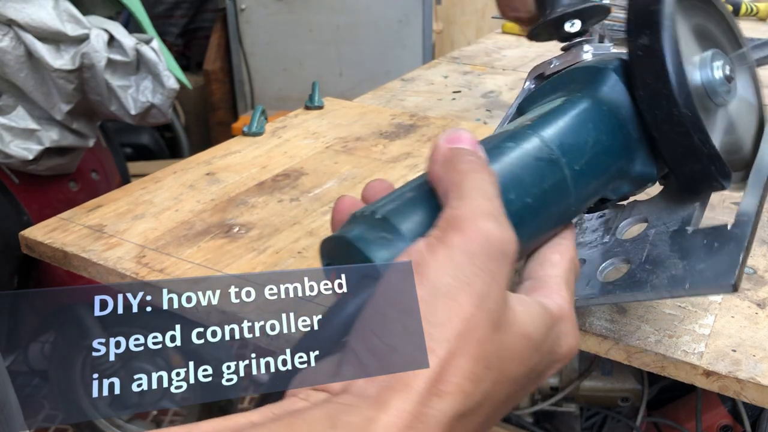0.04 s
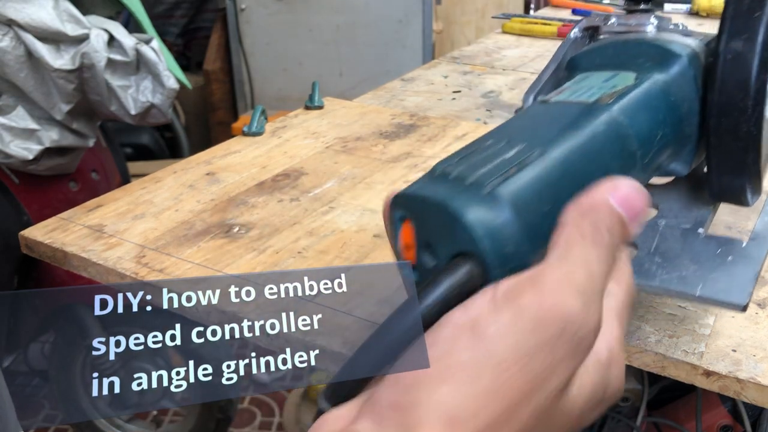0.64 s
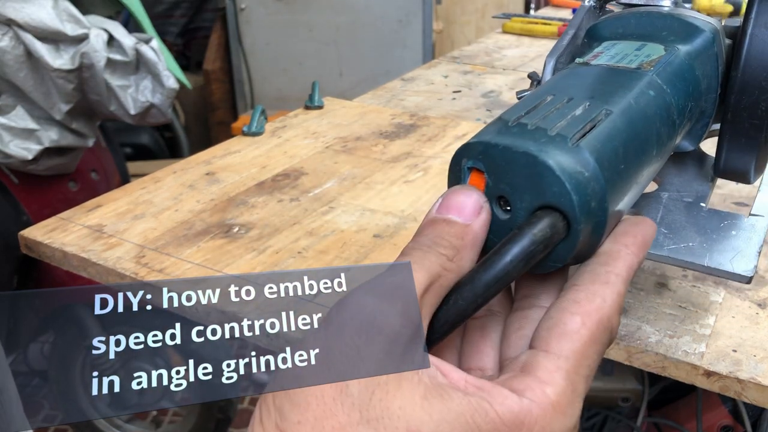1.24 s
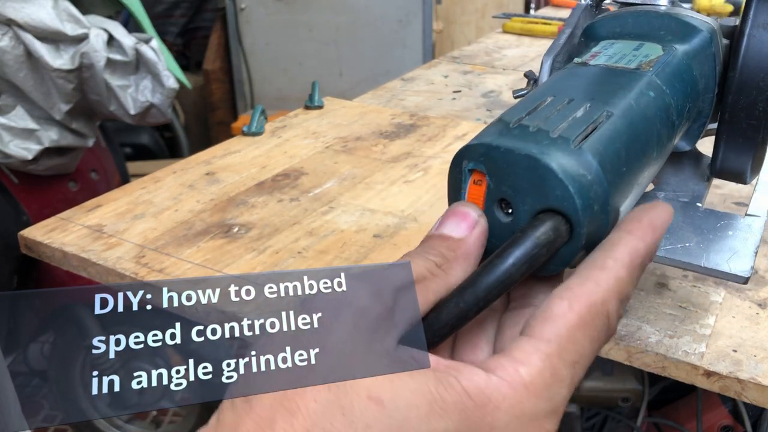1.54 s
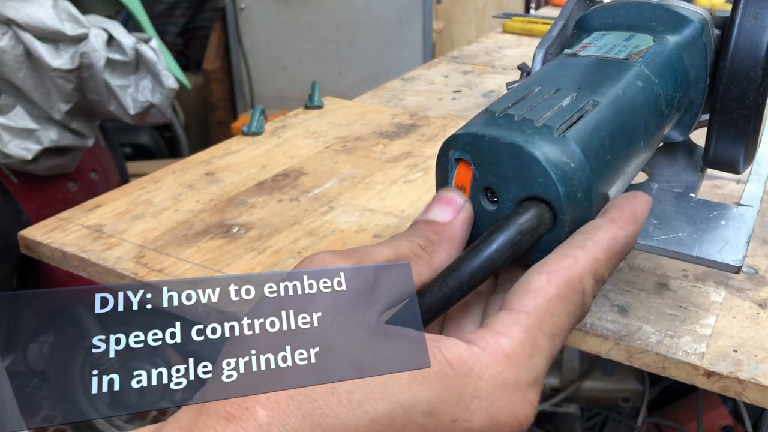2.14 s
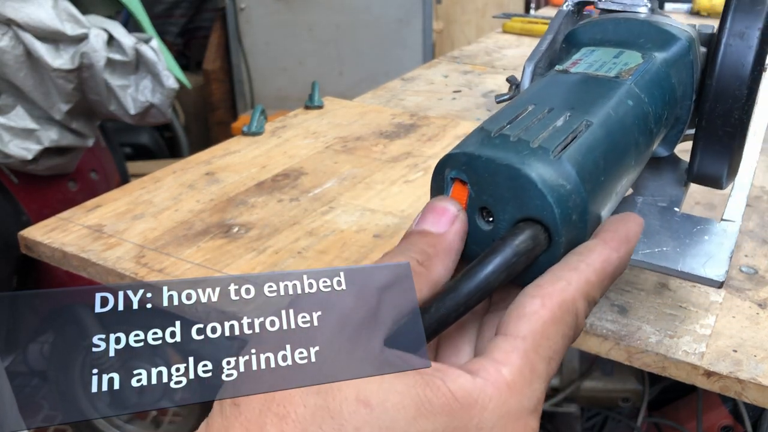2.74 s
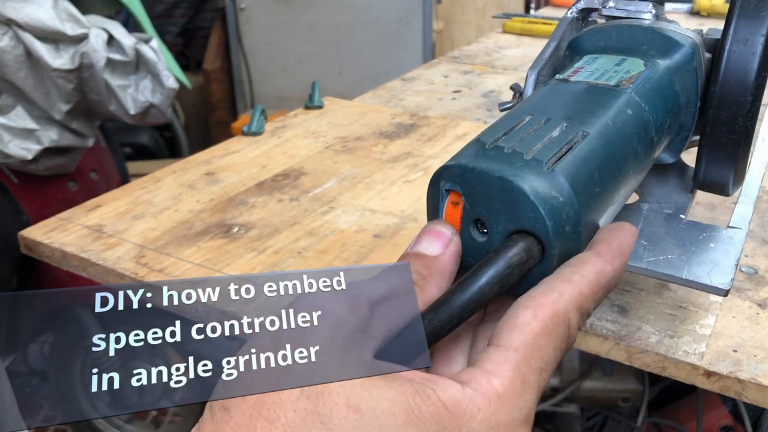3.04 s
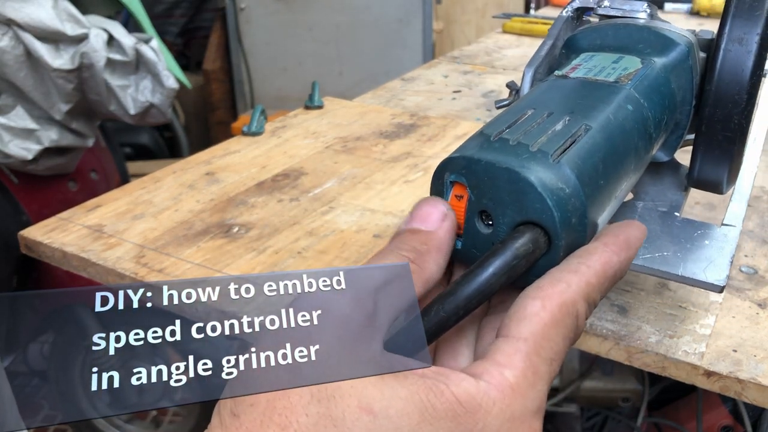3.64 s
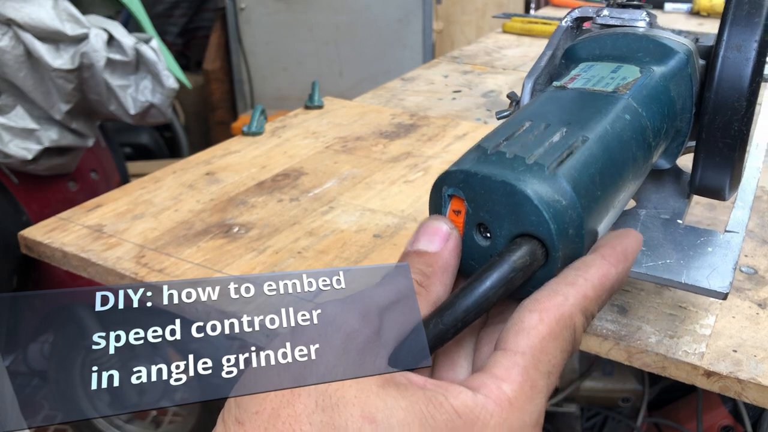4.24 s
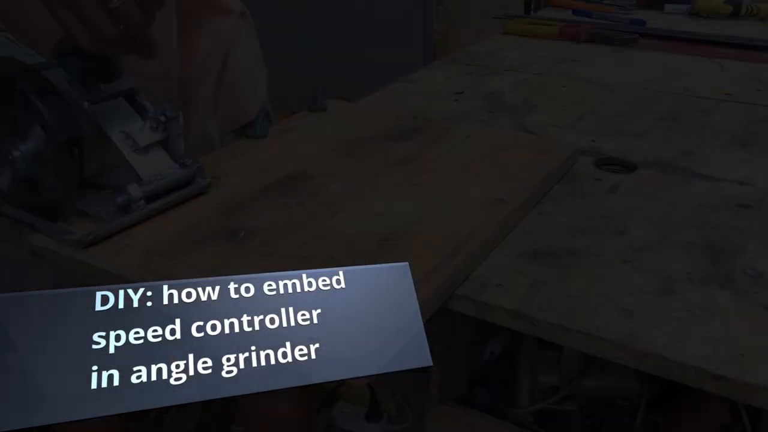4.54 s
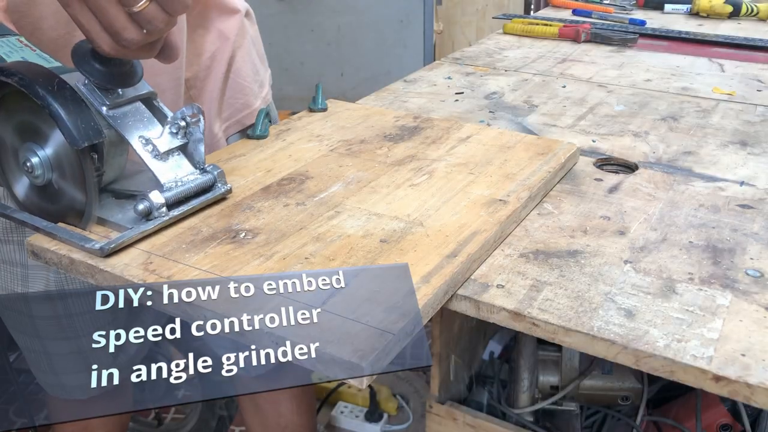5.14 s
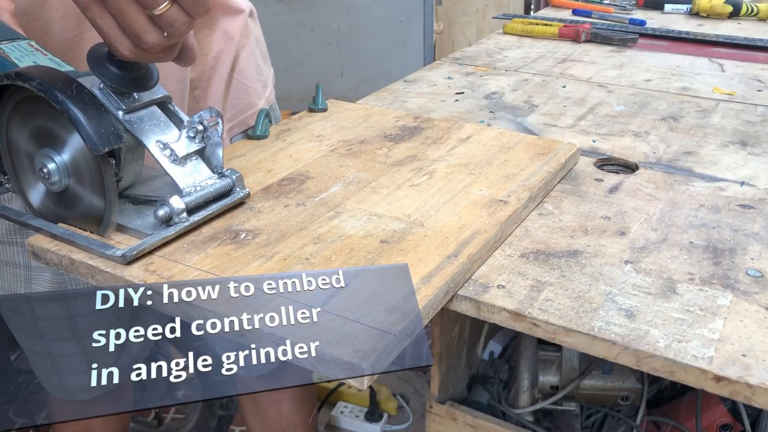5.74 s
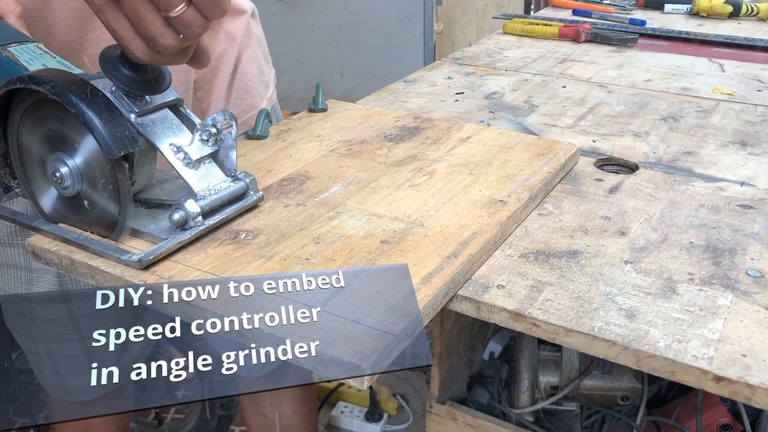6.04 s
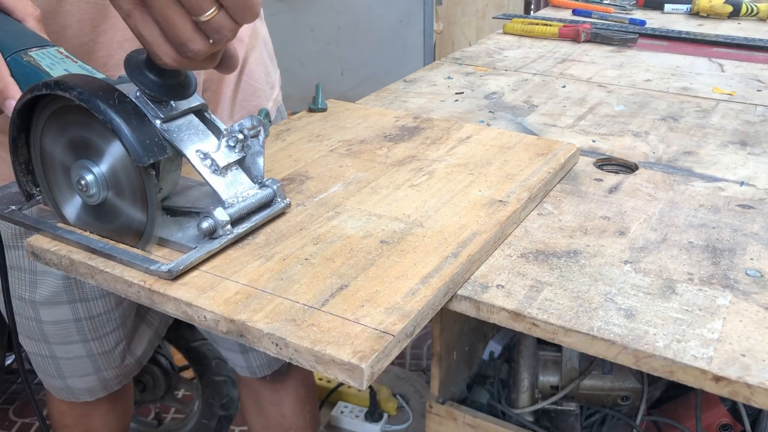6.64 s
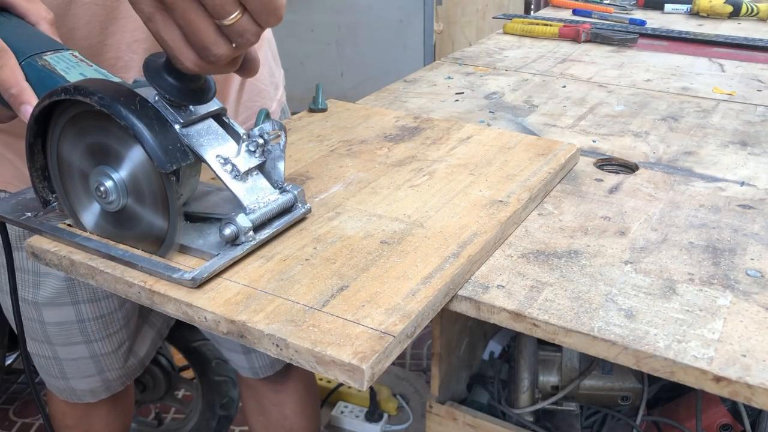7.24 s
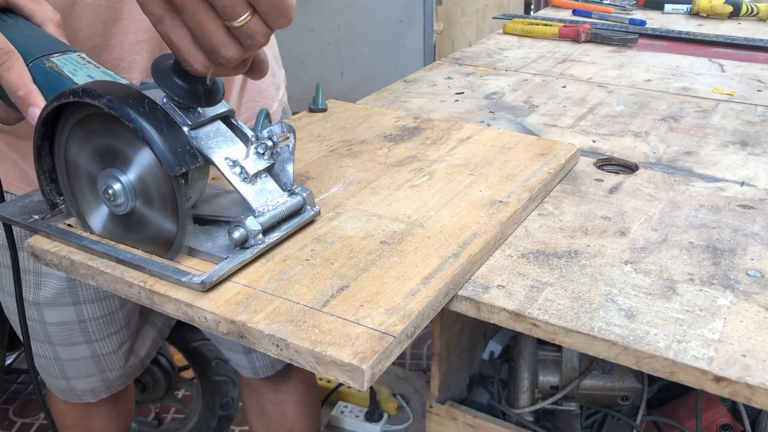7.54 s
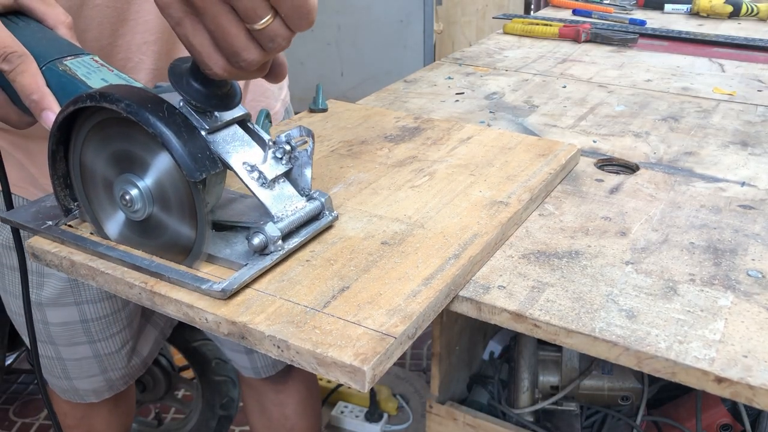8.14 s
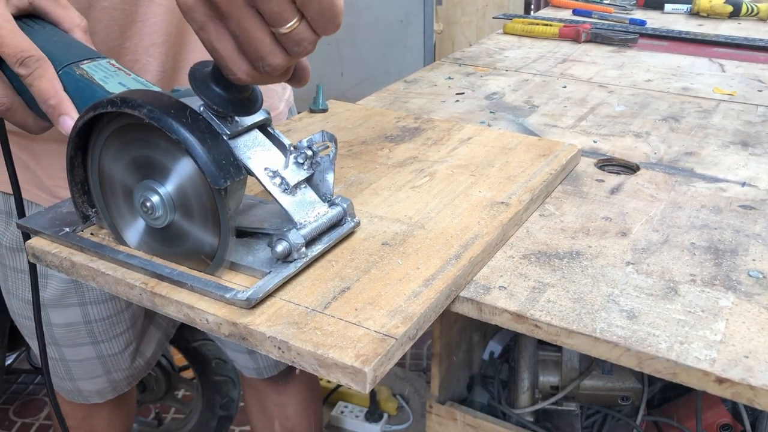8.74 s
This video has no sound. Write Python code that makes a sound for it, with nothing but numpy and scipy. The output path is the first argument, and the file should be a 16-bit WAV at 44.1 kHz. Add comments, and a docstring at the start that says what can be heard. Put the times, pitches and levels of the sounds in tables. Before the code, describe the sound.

An angle grinder runs free, whining with rushing air and clacking gears, then abruptly its spinning saw blade is heard ringing and hissing.

```python
"""An angle grinder with a saw blade runs free on a workbench while its speed dial is turned. The microphone
starts close to the motor end: the whine climbs and eases over the rush of the fan, and the bevel gears clack in
their backlash. Now and then the sound's noise cuts out for an instant. At 4.5 s the position changes abruptly
to the blade side: the spinning disc sings, with brief squeals, and its teeth hiss. From 6 s the fan's draught
puffs on the microphone."""
import sys
import numpy as np
from scipy import signal
from scipy.fft import rfft, irfft
from scipy.io import wavfile

SR = 44100
rng = np.random.default_rng(int(sys.argv[2]) if len(sys.argv) > 2 else 0)


def unload_audio(sound):
    """Save the sound as a 16-bit wav file, at the path given as the first command line argument."""
    columns = np.transpose(np.atleast_2d(sound))
    # keep every value between -1 and 1, then stretch to whole-number steps
    steps = np.round(np.clip(columns, -1, 1) * 32767)
    wavfile.write(sys.argv[1], SR, steps.astype(np.int16))


N = 396459
T = np.arange(N) / SR
MOTOR_END_UNTIL_S, BLADE_SIDE_FROM_S = 4.546, 4.563
SWING_S = 0.4   # the tool is swung from side-on to rear-on to the microphone
CUTOFF_HZ = 15850

# Microphone close to the motor end. Levels in all tables are relative: each source adds its own gain.
# rotor speed: (time [s], speed [turns/s])
MOTOR_END_SPEED = [(0, 440), (.25, 450), (.55, 465), (1, 487), (1.6, 487), (2.15, 503), (2.8, 495),
                   (3.4, 486), (4, 474), (4.55, 461)]
# main whine, at twice the rotor speed: (time [s], level [dB])
MAIN_WHINE = [(0.1, -46.5), (.45, -41), (1.7, -38.5), (2.0, -50), (2.5, -46), (2.72, -35.5), (3.6, -36.5),
              (3.85, -43.5), (4.54, -42)]
# other whine lines: (multiple of rotor speed, level at part speed [dB], level at full speed [dB])
WHINE_LINES = [(1, -57, -58.5), (3, -51, -38), (4, -35.5, -51.5), (5, -42, -41)]
# fan rush spectrum: (frequency [Hz], level [dB])
FAN_SPECTRUM = [(150, -26.5), (400, -14.5), (800, -8.5), (1500, -6), (2100, -1.5), (2750, -6.5),
                (3500, -1.5), (5000, -4), (5800, 0), (7500, -3.5), (9700, -9.5), (11700, -6), (13500, -11),
                (15800, -7)]
# air leaving the vents: (time [s], drone level [dB], rumble level [dB])
VENT_AIR = [(0, -60.5, -67), (1.4, -58.5, -70), (2.0, -55, -63), (2.85, -48.5, -53.5), (3.3, -47.5, -55),
            (3.8, -46.5, -59), (4.45, -47, -49)]
# vent drone spectrum: (frequency [Hz], level [dB])
DRONE_SPECTRUM = [(60, -11), (100, -8.5), (130, 3.5), (170, -3), (230, -5), (400, -12), (600, -23)]
# draught rumble spectrum: (frequency [Hz], level [dB])
RUMBLE_SPECTRUM = [(28, -20), (45, -8), (65, 3), (90, -5), (130, -6), (250, -27)]
# disc resonances heard from the motor end: (frequency [Hz], width [Hz], level [dB])
NEAR_DISC_MODES = [(2105, 70, -39), (2322, 35, -42), (3735, 70, -42), (4258, 110, -38), (5700, 280, -39),
                   (7120, 120, -46), (11800, 70, -42), (14900, 70, -48)]
# gear case resonances: (frequency [Hz], width [Hz], level side-on [dB], level rear-on [dB])
CASE_MODES = [(3520, 490, 3.5, 1), (4360, 215, -5, 8.5), (4790, 190, 6, 5), (5620, 290, 6, 1.5),
              (7030, 790, 4, -6), (8380, 400, -3, 0.5), (8980, 250, -1, -2.5), (12530, 640, -5, -14),
              (11720, 110, -10, -10), (12800, 890, -16, -6.5), (15100, 400, -1, -19)]
# single hard clacks: (time [s], level [dB])
HARD_CLACKS = [(0.0209, -6), (0.0458, -6), (0.0657, -8), (0.159, -5), (0.1815, -6), (0.4673, -4),
               (0.5596, -5), (0.6734, -4), (1.044, -4), (1.4601, -5), (1.495, -6), (1.6935, -4),
               (1.7823, -6), (1.941, -5), (2.1745, -4), (2.2543, -5), (2.374, -5), (2.4339, -4),
               (2.4738, -5), (2.9238, -4), (3.4032, -5), (3.5349, -5), (3.6042, -6), (3.6516, -4),
               (4.0123, -4), (4.119, -4), (4.364, -5), (4.4243, -3)]
# stray clacks, a few firm and many light: (rate [1/s], level [dB], spread [dB])
STRAY_CLACKS = [(9, -15, 3), (34.9, -20.5, 2.5)]
# bouts of gear chatter: (start [s], end [s], rate [1/s], level [dB])
CHATTER_BOUTS = [(0.084, .45, 52, -22), (.51, 1.359, 96, -15.5), (1.382, 1.43, 65, -15),
                 (1.734, 1.81, 55, -22), (2.126, 2.204, 80, -17.5), (2.595, 2.653, 135, -13.5),
                 (3.091, 3.35, 65, -17.5), (3.471, 3.502, 105, -14.5), (3.65, 3.788, 125, -15.5),
                 (3.833, 3.9, 65, -13.5), (4.025, 4.089, 105, -15), (4.128, 4.21, 125, -14.5),
                 (4.429, 4.54, 108, -14.5)]
# the sound's noise cuts out for an instant, at both positions: (time [s], half length [s], depth [dB])
DROPOUTS = [(1.627, .016, 20), (1.89, .023, 34), (2.086, .007, 9), (4.326, .008, 11), (5.059, .016, 36),
            (5.26, .011, 17), (5.623, .01, 12), (6.939, .033, 42), (8.006, .014, 31)]

# Microphone on the blade side.
# rotor speed: (time [s], speed [turns/s])
BLADE_SIDE_SPEED = [(4.56, 420), (4.8, 380), (5.15, 303), (5.5, 274), (5.9, 303), (6.35, 330), (6.52, 320),
                    (6.7, 360), (7, 363), (7.5, 382), (8, 371), (8.3, 380), (8.52, 324), (8.72, 332),
                    (8.99, 314)]
# fan rush: (time [s], level [dB])
BLADE_SIDE_FAN = [(4.57, -47.5), (5.9, -48), (6.5, -51.5), (8.3, -49.5), (8.48, -52), (8.66, -43.5),
                  (8.99, -41)]
# fan rush spectrum: (frequency [Hz], level [dB])
BLADE_SIDE_FAN_SPECTRUM = [(25, -25), (60, -8), (150, -8.5), (240, -7), (330, 0), (700, -2), (1100, 0),
                           (1700, 3), (2300, 5.5), (3300, 7.5), (4700, -6), (7800, -6.5), (15800, 4.5)]
# spectrum of the fine hiss off the rim: (frequency [Hz], level [dB])
RIM_SPECTRUM = [(7000, -3), (8500, -7), (10500, -4), (12000, 1), (13500, -3), (15800, -17)]
# motor whine: (time [s], level [dB])
BLADE_SIDE_WHINE = [(4.8, -55), (5.1, -75), (6.2, -63), (6.5, -60), (7.3, -54.5), (8.3, -61.5),
                    (8.7, -48.5), (8.99, -43)]
# low, middle and top disc modes, then bands of tooth hiss:
# (frequency when slow [Hz], shift when fast [Hz], width [Hz], level slow [dB], level fast [dB])
LOW_MODES = [(2135, -25, 100, -3, -5), (2300, 10, 90, -17, -11), (2850, 65, 110, -11, -10),
             (3850, 40, 60, -10, -11), (4380, -100, 45, -16, -14), (5085, 70, 40, -12, -14)]
MID_MODES = [(7570, -40, 95, -9, -14), (8100, 90, 70, -6, -5), (8530, -130, 105, -13, -14),
             (8980, -90, 95, -8, -12), (9720, 150, 130, -2, -1), (10110, -370, 90, -5, -10),
             (10670, -115, 80, -6, -9), (11530, 100, 95, -1, 2), (11780, -260, 125, -5, -6),
             (12580, -110, 65, -8, -8)]
TOP_MODES = [(13370, 80, 220, 1, 2), (13650, 100, 130, -1, -4), (14030, 50, 130, -6, -3),
             (14580, -130, 85, -8, -5), (14940, -40, 185, -2, -4), (15170, 215, 125, -2, 1),
             (15690, 20, 100, -2, -5)]
TOOTH_BANDS = [(5790, 110, 210, 6, -8), (6100, 300, 605, 4, -1), (6540, 80, 150, 0, -1),
               (7040, 40, 185, 0, -5)]
# ringing of the low disc modes: (time [s], level [dB])
LOW_RING = [(4.57, -36.5), (5.55, -38), (6.2, -32), (7.2, -34.5), (8.35, -38.5), (8.38, -44.5),
            (8.6, -38.5), (8.67, -25.5), (8.82, -36.5), (8.99, -29)]
# ringing of the upper disc modes: (time [s], middle level [dB], top level [dB])
UPPER_RING = [(4.6, -25, -26.5), (5.2, -27, -28.6), (5.35, -31, -29), (5.5, -29, -27), (5.9, -30, -27),
              (6.05, -25.5, -25), (6.55, -28.5, -27.2), (6.65, -32.5, -34.1), (6.82, -27.5, -27.5),
              (7.9, -28.0, -26), (8.35, -29, -29), (8.365, -42, -45.6), (8.58, -38.6, -50),
              (8.72, -25, -28), (8.8, -37.5, -48), (8.99, -32, -40)]
# hiss of the saw teeth: (time [s], level [dB])
TOOTH_HISS = [(4.57, -32), (4.95, -24), (5.75, -24), (6.4, -29.5), (6.8, -28), (7.45, -33), (8.35, -29.5),
              (8.365, -38), (8.99, -26.5)]
# brief squeals, and two narrow bands of hiss near 5.7 kHz at the end:
# (start [s], end [s], frequency [Hz], width [Hz], level [dB])
SQUEALS_AND_HISS = [(4.57, 4.86, 13600, 300, -31), (4.625, 4.745, 3700, 25.3, -40),
                    (4.966, 5.054, 3830, 5.6, -38), (5.166, 5.24, 3820, 4.3, -42),
                    (6.201, 6.466, 3427, 7, -42), (6.906, 6.968, 2152, 10, -33.5),
                    (7.992, 8.016, 2130, 9.65, -42), (8.645, 8.772, 3490, 3.8, -36),
                    (8.621, 9.098, 5670, 66, -39.5), (8.88, 9.096, 5740, 170, -42)]
# puffs on the microphone: (time [s], level [dB])
PUFFS = [(6.021, -40.5), (6.375, -31.5), (6.418, -33), (7.98, -32.5), (8.045, -30.5), (8.145, -28),
         (8.167, -33), (8.205, -28), (8.234, -33), (8.277, -26.5), (8.3, -29)]


def from_db(db):
    """Decibels to gain."""
    return 10 ** (np.asarray(db) / 20)


def unit_power(x):
    """Scale to unit power along time."""
    return x / np.sqrt(np.mean(x ** 2, axis=-1, keepdims=True) + 1e-20)


def in_time(rows):
    """Each column of a curve, sample by sample."""
    s, *columns = np.transpose(rows)
    return [np.interp(T, s, c) for c in columns]


def drift(rate_hz):
    """Smooth random wander with a spread of 1."""
    r = np.exp(-16 * np.pi * rate_hz / SR)
    slow = signal.lfilter([1], [1, -2 * r, r * r], rng.standard_normal(N // 8 + 4002))[4000:]
    return np.interp(np.arange(N) / 8, np.arange(len(slow)), unit_power(slow))


def noise(spectrum):
    """Steady noise of a given colour, unit power."""
    hz, level_db = np.transpose(spectrum)
    f = np.maximum(np.arange(N // 2 + 1) * SR / N, 1)
    gain = from_db(np.interp(np.log(f), np.log(hz), level_db))
    gain *= (f < CUTOFF_HZ) * np.minimum(f / hz[0], 1)
    return unit_power(irfft(rfft(rng.standard_normal(N)) * gain, N))


def phase_of(hz):
    """Running angle of a frequency that may move."""
    return 2 * np.pi * np.cumsum(hz + np.zeros(N)) / SR


def singing(hz, width_hz):
    """A resonance kept ringing at random: a tone of wandering strength and phase, unit power."""
    angle = phase_of(hz)
    return drift(0.56 * width_hz) * np.cos(angle) + drift(0.52 * width_hz) * np.sin(angle)


def resonate(x, hz, width_hz):
    """Two-pole resonance with a peak gain of 1."""
    r = np.exp(-np.pi * width_hz / SR)
    poles = [1, -2 * r * np.cos(2 * np.pi * hz / SR), r * r]
    return signal.lfilter(np.array([1, 0, -1]) * (1 - r * r) / 2, poles, x)


def band(x, low_hz, high_hz, order=5):
    """Butterworth band-pass."""
    return signal.sosfilt(signal.butter(order, [low_hz, high_hz], "band", fs=SR, output="sos"), x)


def motor_whine(dropout, part_speed=455, full_speed=495, waver_db=2.9):
    """Close up, the motor whines at multiples of its rotor speed."""
    speed, = in_time(MOTOR_END_SPEED)
    angle = phase_of(speed * (1 + 0.00089 * drift(16.8)))
    pace = np.clip((speed - part_speed) / (full_speed - part_speed), 0, 1)
    lines = [(2, in_time(MAIN_WHINE)[0])]
    lines += [(k, part + pace * (full - part)) for k, part, full in WHINE_LINES]
    lines += [(k, -47 + 11 * (1 - dropout)) for k in range(6, 15)]
    return sum(from_db(db + waver_db * drift(23)) * np.sqrt(2) * np.sin(k * angle) for k, db in lines)


def fan_air(rush_db=-24.5, side_boost_db=1.3, flutter_db=2.5):
    """The fan drives air through the vents: a fluttering rush, a drone and the rumble of the draught."""
    side_on = np.clip(2 - T / SWING_S, 0, 1)   # the vents face the microphone at first
    rush = from_db(rush_db + side_boost_db * side_on + flutter_db * drift(110)) * noise(FAN_SPECTRUM)
    drone_db, rumble_db = in_time(VENT_AIR)
    drone = from_db(drone_db + 1 + 3.8 * drift(12)) * noise(DRONE_SPECTRUM)
    rumble = from_db(rumble_db + 1) * noise(RUMBLE_SPECTRUM)
    return rush + drone + rumble


def near_disc_ring(dropout):
    """The disc's modes ring faintly as steady tones behind the motor end."""
    ring = sum(from_db(db) * singing(hz, width) for hz, width, db in NEAR_DISC_MODES)
    return from_db(0.8 + 4 * (1 - dropout)) * ring


def clack_times(backlash_s=.004, free_flight_s=.012, rebound_s=.0098, rebound_chance=.7, scatter=.42):
    """Times and levels of gear teeth striking: uneven bouts, strays and single hard clacks."""
    events = []
    for start, end, per_s, db in CHATTER_BOUTS:
        chance = rng.standard_normal((160, 2))
        stretch = np.exp(scatter * chance[:, 0] - scatter ** 2 / 2)
        gaps = backlash_s + max(1 / per_s - backlash_s, 0) * stretch   # crossing the backlash takes time
        s = start + np.cumsum(gaps) - gaps[0]
        events += list(zip(s[s < end], db + 2.2 * chance[:, 1]))
    for per_s, db, spread_db in STRAY_CLACKS:
        s = (np.arange(400) + rng.random(400)) / per_s
        events += list(zip(s[s < MOTOR_END_UNTIL_S], db + spread_db * rng.standard_normal(len(s))))
    hard = np.array(HARD_CLACKS) + [.0008, -8]   # offsets (time [s], level [dB])
    rebounds = hard[rng.random(len(hard)) < rebound_chance] + [rebound_s, -1.5]   # off the other flank
    hard = np.vstack([hard, rebounds])
    # the teeth fly free around a hard clack, so lighter ones are skipped
    free_from, free_until = hard[:, 0] - free_flight_s, hard[:, 0] + backlash_s
    events = [(s, db) for s, db in events if not np.any((s > free_from) & (s < free_until))]
    return np.vstack([hard, events]).T


def gear_clacks(side_contact_s=.002, rear_contact_s=.0009, tail_s=.0022, vary_db=2.2):
    """Teeth slap across their backlash: rough contact and a short rattle ring the gear case."""
    s, db = clack_times()
    rear_on = np.clip((s - SWING_S) / 0.16 + .5, 0, 1)
    contact = (side_contact_s + rear_on * (rear_contact_s - side_contact_s))[:, None]
    age = np.arange(SR // 100) / SR
    force = np.where(age < contact, 1, from_db(-10) * np.exp(-(age - contact) / tail_s))
    slaps = rng.choice([-1., 1.], (2000, len(age)))[:len(s)] * force
    chance = rng.standard_normal((2000, len(CASE_MODES)))[:len(s)]
    rings = 0
    for k, (hz, width, side_db, rear_db) in enumerate(CASE_MODES):
        strength = from_db(side_db + rear_on * (rear_db - side_db) + vary_db * chance[:, k])
        rings = rings + (-1) ** k * strength[:, None] * resonate(slaps, hz, width)
    rings = unit_power(rings) * from_db(db - 7)[:, None]
    rings *= np.sqrt(contact / rear_contact_s)   # longer contact, more energy
    onsets_s = np.maximum(s - (contact[:, 0] - rear_contact_s) / 2, 0)
    out = np.zeros(N)
    for start, ring in zip((onsets_s * SR).astype(int), rings):
        out[start:start + len(ring)] += ring
    return out


def dropouts():
    """Gain that cuts the sound's noise for an instant, leaving bare tones, some slightly louder."""
    dips_db = sum(depth * np.exp(-np.minimum(((T - s) / half) ** 4, 20)) for s, half, depth in DROPOUTS)
    return from_db(-dips_db)


def blade_side_air():
    """From the blade side the fan's rush is softer, joined by fine hiss off the rim."""
    fan_db, = in_time(BLADE_SIDE_FAN)
    mid_db, top_db = in_time(UPPER_RING)
    rush = from_db(fan_db + 10.5) * noise(BLADE_SIDE_FAN_SPECTRUM)
    rim = from_db((mid_db + top_db) / 2 - 7) * noise(RIM_SPECTRUM)
    return rush + rim


def blade_side_whine(speed):
    """Four multiples of the rotor speed carry faintly to the blade side."""
    lines = [(2, -2), (3, -7.5), (4, 3), (5, -2)]   # (multiple, level [dB])
    whine = sum(from_db(db) * singing(k * speed, 34) for k, db in lines)
    return whine * from_db(in_time(BLADE_SIDE_WHINE)[0])


def spinning_modes(modes, pace, swell_db=1.5, swell_hz=4.3):
    """Waves run round the disc with or against its spin, so each mode rises or falls with speed."""
    out, power = 0, 0
    for slow_hz, shift_hz, width, slow_db, fast_db in modes:
        gain = from_db(slow_db + np.clip(pace, 0, 1) * (fast_db - slow_db))
        swell = from_db(swell_db * drift(swell_hz))
        out = out + gain * swell * singing(slow_hz + pace * shift_hz, width)
        power = power + gain ** 2
    return out / np.sqrt(power)


def disc_ring(pace, dropout):
    """Turbulence keeps the disc singing in its low, middle and top modes."""
    low_db, = in_time(LOW_RING)
    mid_db, top_db = in_time(UPPER_RING)
    low = from_db(low_db - 1) * band(spinning_modes(LOW_MODES, pace, swell_db=1.8), 1540, 5700)
    mid = from_db(mid_db - 2) * spinning_modes(MID_MODES, pace)
    top = from_db(top_db - 1) * spinning_modes(TOP_MODES, pace)
    return low * dropout ** 0.58 + mid + top


def tooth_hiss(pace, dropout):
    """The saw teeth hiss in bands whose pitch rises with speed."""
    hiss = band(spinning_modes(TOOTH_BANDS, pace, swell_db=0), 5450, 7400)
    return from_db(in_time(TOOTH_HISS)[0]) * hiss * dropout ** 0.047


def squeals_and_hiss(edge_s=0.015, waver_db=3.5):
    """Brief squeals as one disc mode builds up, and two narrow bands of hiss near 5.7 kHz at the end."""
    out = 0
    for start, end, hz, width, db in SQUEALS_AND_HISS:
        swell = np.clip(np.minimum(T - start, end - T) / edge_s + .5, 0, 1)
        gain = swell * from_db(db + waver_db * drift(18))
        out = out + gain * np.sqrt(2) * np.sin(phase_of(hz + .5 * width * drift(55.1)))
    return out


def puffs(spread_s=.0075, db_per_octave=6):
    """Air from the motor's fan gusts onto the microphone; harder puffs are brighter."""
    out = np.zeros(N)
    age = np.arange(-(SR // 10), SR // 10) / SR
    window = np.exp(-.5 * (age / spread_s) ** 2)
    for s, db in PUFFS:
        bright_hz = np.clip(296 * 2 ** ((db + 33) / db_per_octave), 60, 2000)
        eddy = window * band(rng.standard_normal(len(age)), 30, bright_hz, order=2)
        eddy *= np.sqrt(np.sum(window ** 2) / np.sum(eddy ** 2))
        start = int(s * SR) - len(age) // 2
        out[start:start + len(age)] += from_db(db - 3) * eddy
    return out


def scene(slow_speed=310, fast_speed=380):
    """Two microphone positions in turn, a tiny gap between them; mono on both channels."""
    dropout = dropouts()
    motor_end = motor_whine(dropout) + fan_air() * dropout + near_disc_ring(dropout) + gear_clacks() * dropout
    speed, = in_time(BLADE_SIDE_SPEED)
    pace = (speed - slow_speed) / (fast_speed - slow_speed)   # 0 when slow, 1 when fast
    background = (blade_side_air() + blade_side_whine(speed)) * dropout
    blade = disc_ring(pace, dropout) + tooth_hiss(pace, dropout)
    flutter = from_db(0.87 * drift(104))
    blade_side = background + blade * flutter + squeals_and_hiss() + puffs()
    fade_out = np.clip((MOTOR_END_UNTIL_S - T) / .001, 0, 1)
    fade_in = np.clip((T - BLADE_SIDE_FROM_S) / .01, 0, 1)
    mono = fade_out * motor_end + fade_in * blade_side
    return np.array([mono, mono])


def record(dry):
    """Peaks are rounded off and the highest treble is cut."""
    ceiling = .56
    rounded = dry / (1 + (dry / ceiling) ** 4) ** .25
    return signal.sosfilt(signal.ellip(10, .1, 80, CUTOFF_HZ, fs=SR, output="sos"), rounded)


dry = scene()
out = record(dry)
unload_audio(out)
```